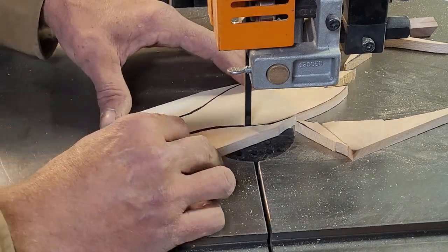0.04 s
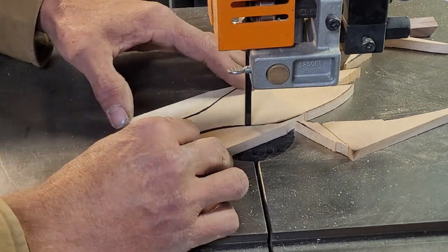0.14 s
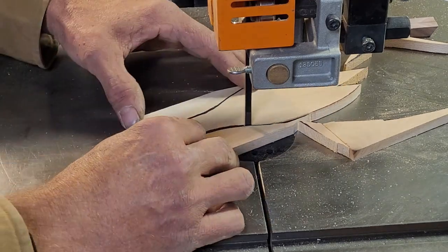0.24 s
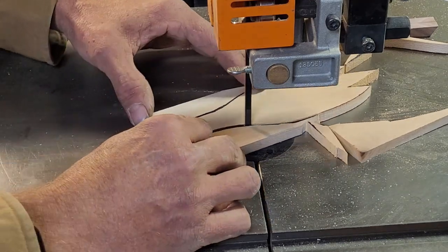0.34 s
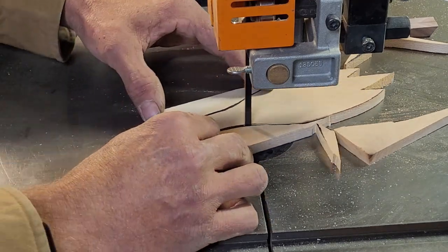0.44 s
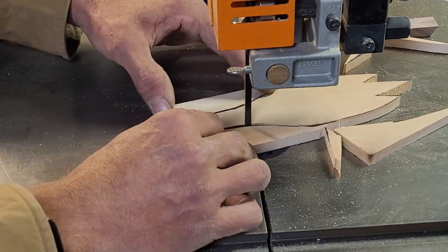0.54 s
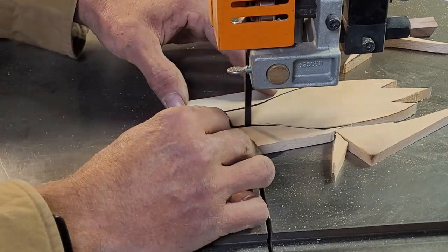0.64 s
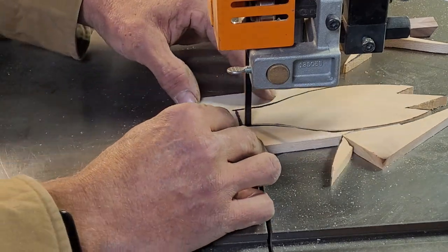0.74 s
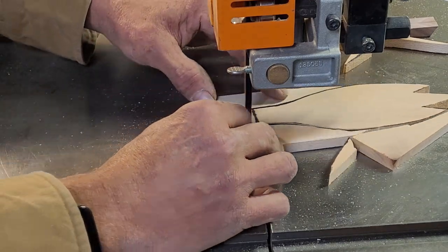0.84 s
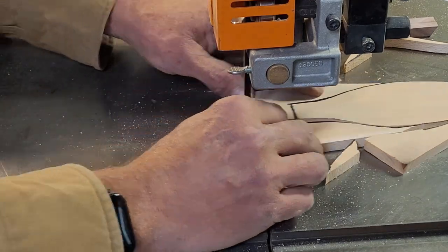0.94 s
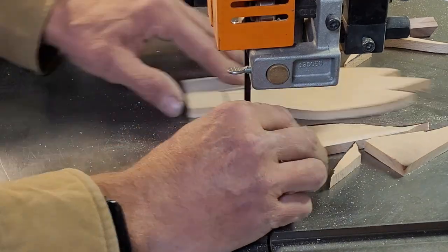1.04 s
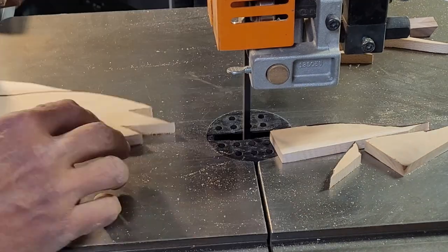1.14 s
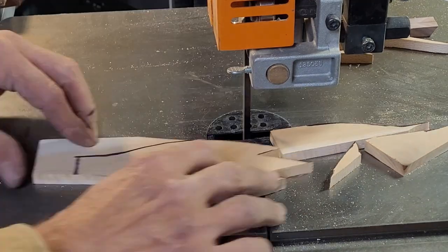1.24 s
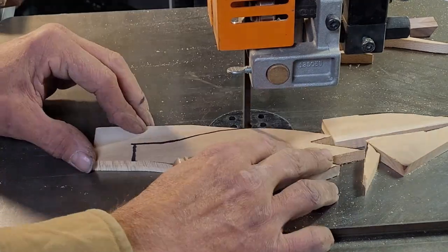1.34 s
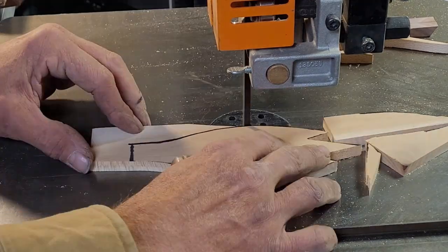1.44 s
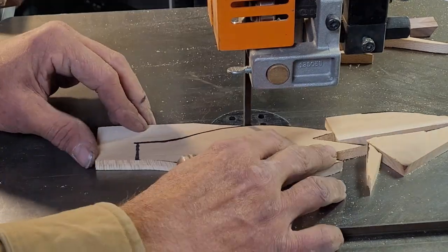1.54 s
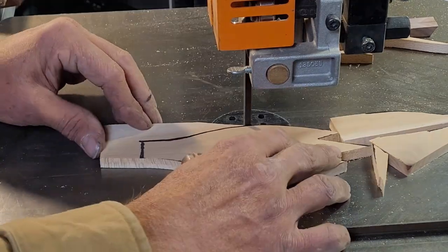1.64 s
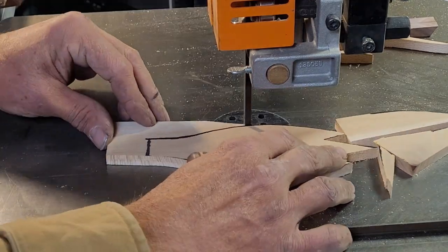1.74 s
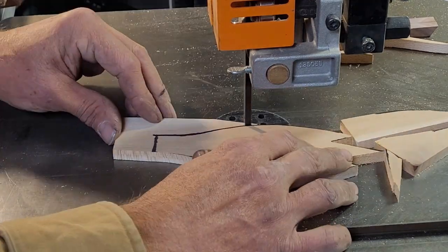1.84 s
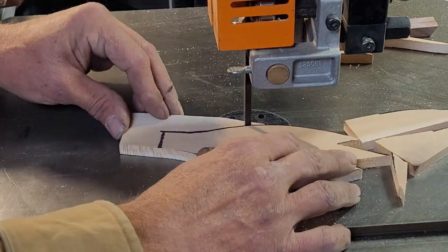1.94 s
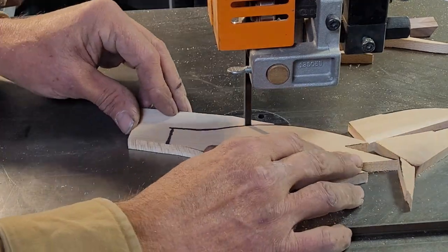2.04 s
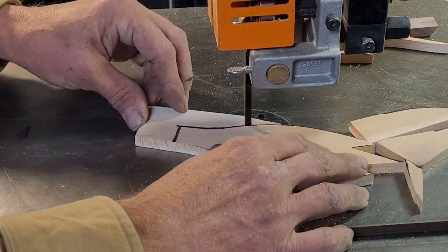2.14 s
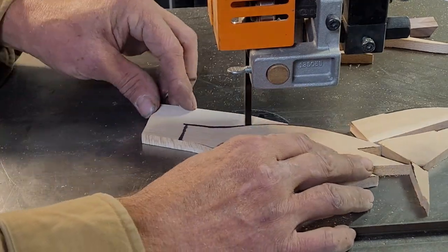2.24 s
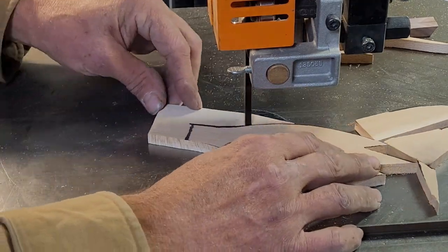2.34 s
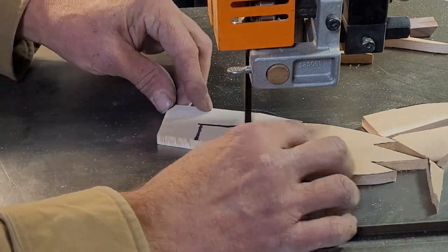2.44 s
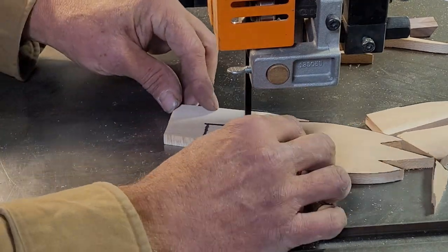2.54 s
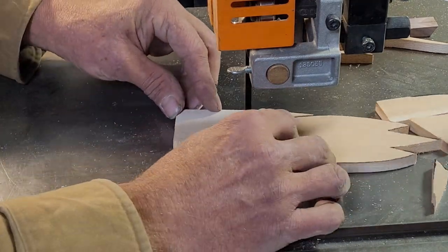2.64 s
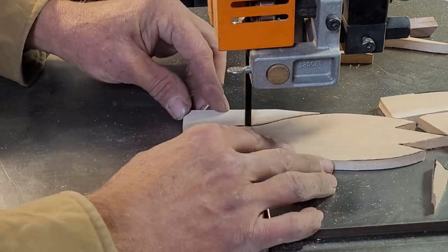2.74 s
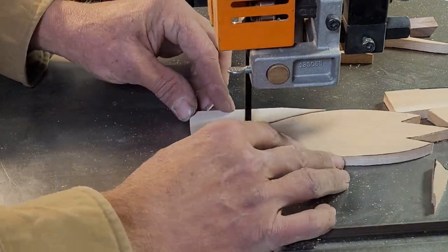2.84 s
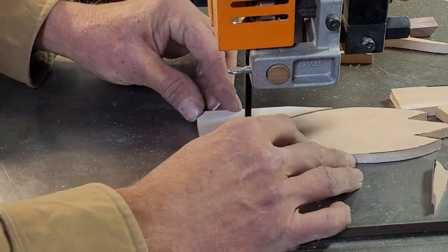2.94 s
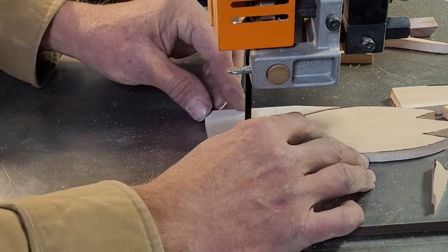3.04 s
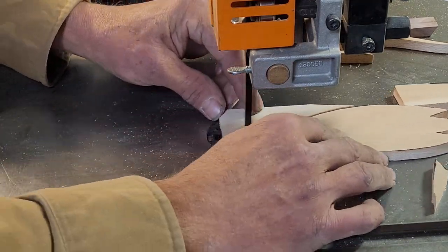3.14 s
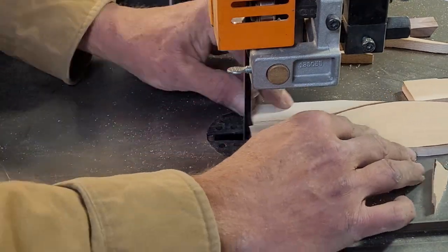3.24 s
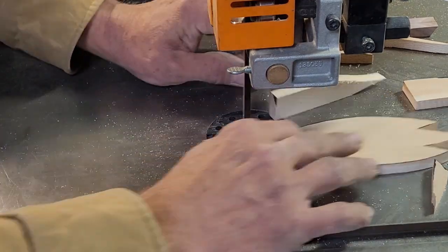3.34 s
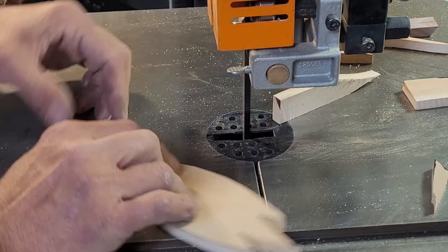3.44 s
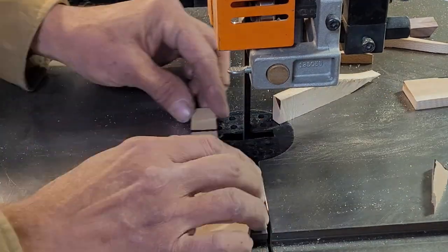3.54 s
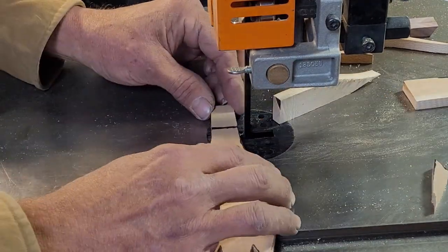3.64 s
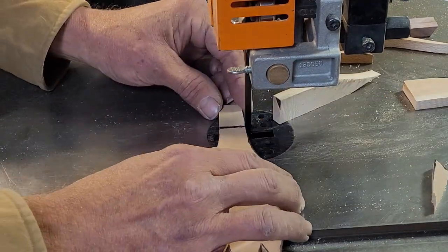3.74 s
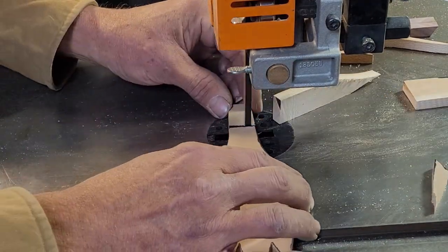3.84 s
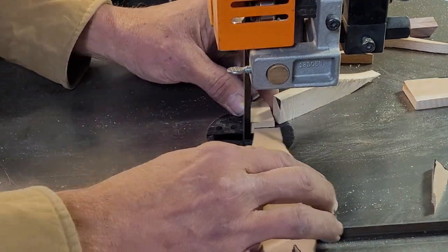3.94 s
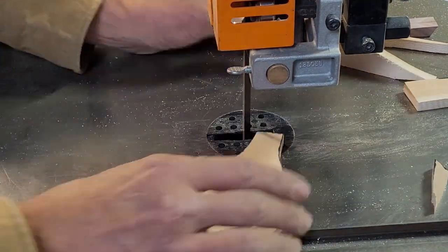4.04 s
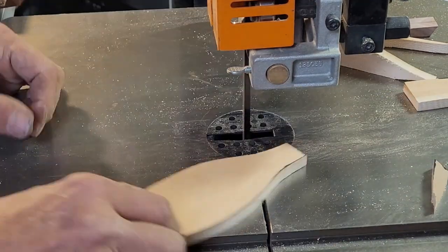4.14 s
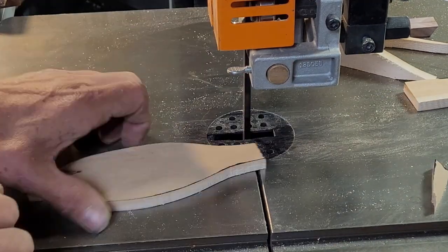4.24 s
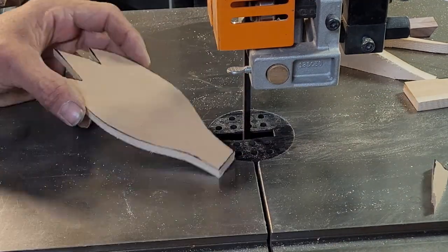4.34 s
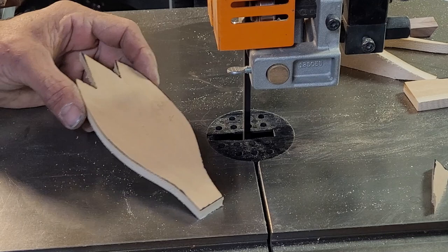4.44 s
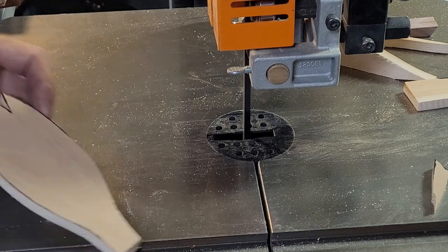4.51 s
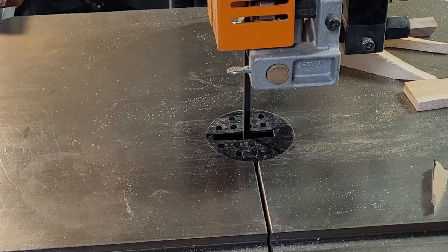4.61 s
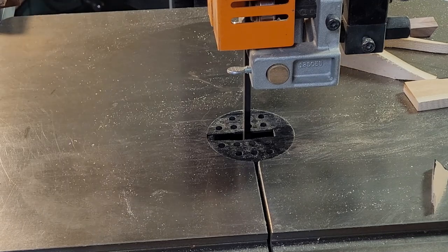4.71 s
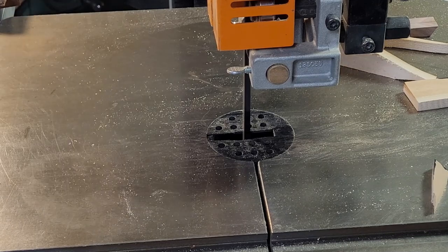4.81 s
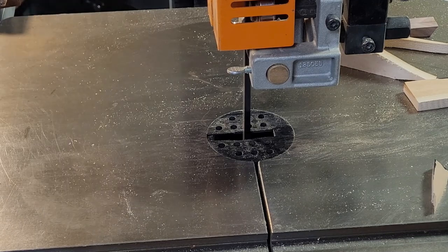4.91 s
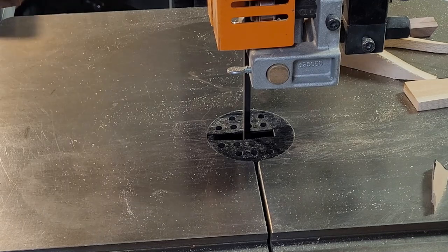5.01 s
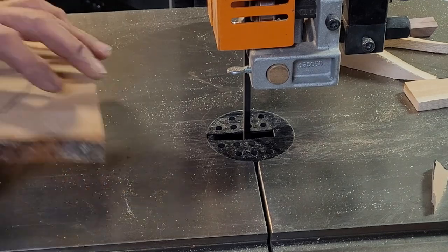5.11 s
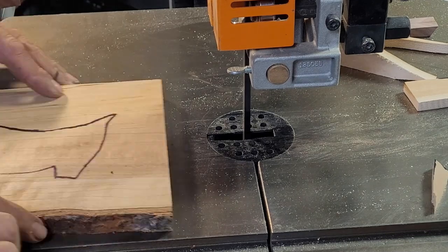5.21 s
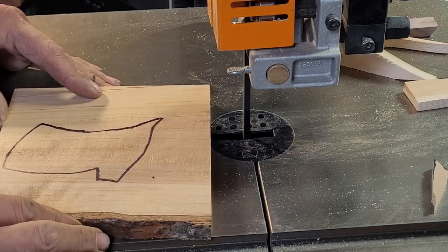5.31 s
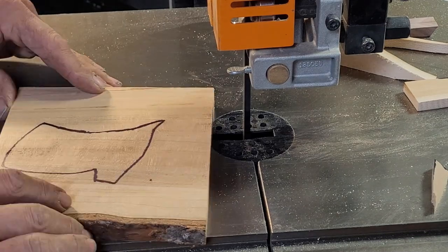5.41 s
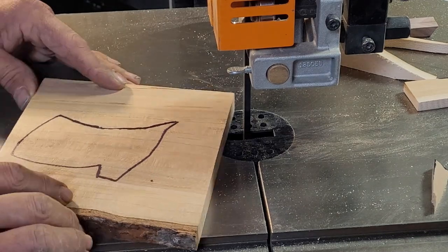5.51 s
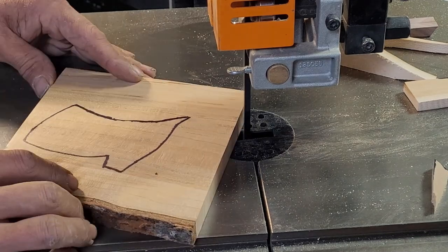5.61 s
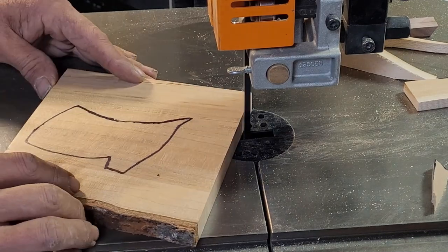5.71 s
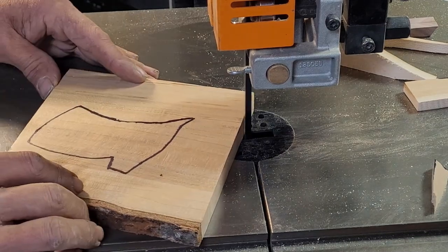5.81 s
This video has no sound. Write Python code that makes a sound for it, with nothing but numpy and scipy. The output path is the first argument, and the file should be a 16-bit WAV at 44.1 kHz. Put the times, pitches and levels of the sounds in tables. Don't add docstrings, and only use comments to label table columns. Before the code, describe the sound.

A bandsaw runs throughout, heard close in a small workshop: low steady hum, ringing frame tones, wavering panel whines and a broad rush of air. The blade is already cutting a curve in wood, with a strong midrange singing tone, a high whistle and fluttering grainy hiss. At about 1.03 s it breaks free with a very short squeal stepping downwards; around 1.3 to 2 s another motor faintly climbs in pitch behind. Only the idling saw remains until about 1.6 s, when a longer, brighter, sizzling cut begins, ending in a squeal at 3.35 s. A short, duller cut runs from 3.8 to 4.04 s and chirps out. The saw idles; a small tap falls at 4.85 s, then rapid hard clacks of board on iron at 5.22 to 5.26 s. At 5.83 s a new whistling cut starts and is cut off. Background level dips after loud moments and recovers.

```python
import sys
import numpy as np
from scipy import signal
from scipy.fft import rfft, irfft, next_fast_len
from scipy.io import wavfile
from scipy.ndimage import map_coordinates

SR = 44100
rng = np.random.default_rng(int(sys.argv[2]) if len(sys.argv) > 2 else 0)


def boost(x):
    u = np.asarray(x, float) / 20
    return 10 ** u


def output_pcm(signal):
    pcm = np.clip(np.atleast_2d(signal).T, -1, 1) * 32767
    wavfile.write(sys.argv[1], SR, np.round(pcm).astype(np.int16))


N = 258867
T = np.arange(N) / SR
SHAFT_HZ = 25.27

# time in seconds, pitch in Hz, level in dB.
FAR_MOTOR = [(0, 301, -76), (.9, 308, -72), (1.3, 317.5, -67), (1.6, 341, -62.5), (1.9, 358, -74),
             (2.1, 368, -80)]
# time in seconds, level in dB.
CAMERA_GAIN = [(0, -56.5), (.96, -55), (1.05, -57), (1.31, -57), (1.4, -53), (1.54, -52.5), (1.78, -56.5),
               (3.6, -56), (3.73, -53.5), (4.05, -56), (4.3, -57), (4.42, -53), (5.08, -54.5), (5.2, -52),
               (5.26, -57.5), (5.5, -57), (5.6, -54), (5.87, -53.5)]
# multiple of ten times the shaft speed, level in dB.
HUM = [(1, -1), (2, -1), (3, -1), (4, -38), (5, -40), (6, -10.5), (7, -7), (8, -22), (10, -11.5)]
# pitch in Hz, width in Hz, level in dB.
FRAME = [(475, 5.3, -16.5), (792, 7.9, -8.5), (890, 39, -9.5), (949, 5, -14), (1145, 52, -6),
         (1349, 7.1, -7), (1473, 11, -11), (2127, 10, -14.5), (6630, 7.6, -15), (9500, 32, -40),
         (11500, 30, -38)]
# frequency in Hz, level in dB per Hz.
RUSH = [(20, -24.5), (40, -24.5), (80, -19.5), (135, -23.5), (180, -9.5), (330, -11), (440, -13),
        (620, -7.5), (1100, -5), (1820, -4), (2330, -12.5), (4330, -13), (5230, -17), (9460, -13.5),
        (15800, -27.5)]
# pitch in Hz, width in Hz, level in dB.
GUIDES = [(3978, 12, -7), (4404, 22, -9), (4253, 40, -14), (2740, 120, -15)]
# pitch in Hz, width in Hz, level in dB.
PANELS = [
    [(690.5, 2, 0)],
    [(1045.5, 2, 0)],
    [(1620, 12, -1)],
    [(1820, 14, -3), (1884, 3, -5)],
]
# start in seconds, length in seconds, level in dB over the motor's lowest tone.
PANEL_SPELLS = [
    [(-.6, 2.2, -4.5), (1.2, 1.35, -3.5), (3.7, 0.32, -6), (4.35, 1.04, -1), (5.5, 0.68, -5)],
    [(.2, 2.25, -1.5), (3.25, 0.38, -4), (3.7, 0.3, -3), (4.25, 0.95, -7.5), (5.45, 0.32, -6)],
    [(-.2, 1.45, -2), (1.3, 1.45, 0.5), (3.05, 0.37, .5), (3.85, 0.56, -6.5), (4.4, 1.4, -8)],
    [(.3, 0.9, 0.5), (1.3, 0.33, -0.5), (1.6, 0.78, 7), (3.05, 0.28, 2.5), (3.9, .25, -3), (4.2, 0.65, -2),
     (5.05, 0.68, -13)],
]
# time in seconds, peak in dB, wood in dB, iron in dB.
KNOCKS = [
    (4.8485, -28, -22, -37),
    (5.2223, -41, 13, -3),
    (5.2303, -32, -9, -11),
    (5.2335, -52, 10, -6),
    (5.2373, -23.5, -21, -14.5),
    (5.2438, -27.5, -2.5, -9),
    (5.2580, -24.5, -12, -15),
]
# pitch in Hz, width in Hz, level in dB.
WOOD = [(860, 83, 2.5), (1400, 270, -1.5), (2180, 770, -5), (3490, 320, -0.5)]
# pitch in Hz, width in Hz, level in dB.
IRON = [(4730, 450, -1), (5800, 220, 6.5)]
# pitch in Hz, width in Hz, level in dB.
EDGE = [(8900, 480, -2.5), (9980, 720, 4), (11850, 2900, -6.5), (15300, 2500, -8), (7640, 2700, -7.5)]
# start in seconds, length in seconds, pitch in Hz, width in Hz.
CHATTER = [(-.2, .55, 4950, 320), (-.1, .4, 6050, 500), (-.2, 1.3, 3985, 25), (.92, .1, 2050, 150),
           (.99, .05, 1570, 60), (.98, .06, 13500, 1500), (1.07, .33, 2650, 12), (1.52, .22, 6700, 40),
           (2.1, 1.15, 3970, 18), (2.27, .09, 7950, 250), (2.5, .95, 1150, 45), (3.2, .1, 2120, 100),
           (3.22, .1, 3300, 500), (3.305, .036, 6100, 600), (3.82, .19, 3500, 110), (3.82, .2, 4750, 150),
           (4.08, .4, 2655, 12), (1.6, 1, 7101, 12), (-.2, .6, 13394, 20), (1.7, .7, 2150, 60),
           (.95, .085, 4950, 250), (.2, .7, 2140, 25)]
CHATTER_DB = [-42, -51, -63, -49.5, -43, -49, -58, -51.5, -57.5, -51, -55.5, -53, -50.5, -40, -49, -52,
              -57.5, -60, -59, -61, -47.5, -58]
# time in seconds, level in dB, stretch in time (1 is normal).
EXITS = [
    (1.028, -30.5, 1.01),
    (3.346, -30, 1.02),
    (4.039, -28.5, .98),
]
# delay in seconds, length in seconds, start in Hz, end in Hz, level in dB.
SQUEAL = [(.0006, 0.0077, 4450, 3910, 0), (.006, 0.0088, 4300, 3900, -11.5),
          (-.001, 0.019, 2700, 2300, -10), (.007, 0.0088, 3350, 3140, -2), (.014, 0.019, 2850, 2500, 0.5),
          (.03, 0.024, 2650, 2300, -15), (0.034, .0197, 2000, 1430, -19), (.004, 0.0226, 8500, 7800, -18.5),
          (.025, 0.015, 6300, 5600, -18.5), (0.012, 0.016, 4300, 3800, -22)]
# time in seconds, feed level in dB, twist (side load of a curve on the blade).
FEED = [
    [(0, -51.5, -0.67), (.2, -52, -1.26), (.3, -52.5, -0.66), (.62, -51, -0.03), (.86, -49, 1.2),
     (1.0, -49, -0.0065), (1.048, -50.5, 1.15), (1.07, -56, 1.2), (1.09, -57, 1.2)],
    [(1.52, -64, 0.1), (1.654, -52.5, -0.16), (2.0, -51, -0.077), (2.3, -51, 0.73), (2.52, -50, -0.23),
     (2.8, -51.5, 0.27), (3.19, -50.5, 0.13), (3.34, -48.5, 0.73), (3.4, -56.5, 0.61)],
    [(3.79, -65, .1), (3.822, -48, .1), (3.944, -52, .1), (4.05, -47.5, .1), (4.12, -63, .1)],
    [(5.826, -75, .1), (5.846, -51.5, 0.093), (5.87, -56, .1)],
]
# start in seconds, rise in seconds, end in seconds, fall in seconds.
SINGING = [
    (-.1, .02, 1.06, .03),
    (1.65, .03, 3.38, .16),
    (3.83, 0.088, 4.08, 0.075),
    (5.83, 0.022, 6.1, .02),
]
# tone in dB, whistle in dB, board in dB, sizzle in dB.
PIECES = [
    (6.5, 0, -0.5, -6),
    (3, -1, -9.5, -1.5),
    (3, -10, -4, -13),
    (4, 2, -22, -3),
]
# start in seconds, length in seconds, extra level in dB.
FLARES = [(1.96, .4, 6), (3.0, 0.19, 2.5), (0.73, .25, 4)]
# pitch in Hz, level in dB, lead of the left in radians.
TONE = [(1731, 0, .9), (1706, -16, .5), (1756, -14, 1.2)]
# pitch in Hz, level in dB, lead of the left in radians.
WHISTLE = [(4965, 0, -.7), (4990, -7, -.5), (5168, -10, .6)]
# pitch in Hz, level in dB, lead of the left in radians.
BOARD = [(2597, 0, .3), (2622.3, -3, .3), (2571.7, -8, .3), (2853, -7, .4)]
# pitch in Hz, width in Hz, level in dB.
SKIRTS = [
    [(1740, 70, -13)],
    [(4885, 50, -11), (5000, 300, -13)],
]
# frequency in Hz, level in dB per Hz.
KERF = [(500, -50), (1500, -2), (2000, -18), (2350, -4.5), (3000, -2), (4100, -3), (5500, -2.5), (8000, -2),
        (12000, -2), (15000, -4), (15800, -11)]
# pitch in Hz, width in Hz, level in dB.
BLADE = [(3590, 40, -18), (6185, 90, -14), (7101, 10, -19), (8403, 25, -22), (13394, 10, -24),
         (15500, 300, -15)]
# pitch in Hz, width in Hz, level in dB.
SIZZLE = [(9440, 120, 3), (10300, 300, 1.5), (10800, 290, 1), (11500, 230, 2)]
# frequency in Hz, likeness (1 is identical).
ALIKE = [(100, 1), (300, 1), (1000, 1), (3000, 0.81), (8000, 0.38), (15000, 0.32)]
# frequency in Hz, left minus right in dB.
LEAN = [(60, 3), (110, -5), (250, 4.5), (380, -6), (700, 2.5), (1290, -0.5), (1730, -5), (2400, -1.5),
        (8000, -3), (15000, 0.5)]


def unit(x):
    return x / np.sqrt(np.mean(x ** 2) + 1e-20)


def along(points, hz):
    f, v = np.transpose(points)
    return np.interp(np.log(hz + 1), np.log(f + 1), v)


def curves(rows):
    s, *cols = np.transpose(rows)
    return [np.interp(T, s, c) for c in cols]


def spans(tables, fade):
    rows = []
    for table in tables:
        quiet = [-85] * (len(table[0]) - 1)
        rows += [(table[0][0] - fade, *quiet), *table, (table[-1][0] + fade, *quiet)]
    return curves(rows)


def wobble(rate):
    return map_coordinates(rng.standard_normal(int(N * rate / SR) + 4), [T * rate])


def swell(s, length):
    return np.abs(np.sin(np.pi * np.clip((T - s) / length, 0, 1)))


def filtered(x, response):
    m = next_fast_len(N + SR // 2)
    return irfft(rfft(x, m) * response(np.fft.rfftfreq(m, 1 / SR)), m)[..., :N]


def noise(gain, alike):
    def response(hz):
        turn = np.arccos(np.clip(alike(hz), -1, 1)) / 2
        return gain(hz) * [np.cos(turn), np.sin(turn)]

    mid, side = filtered(rng.standard_normal((2, N)), response)
    return unit(np.array([mid + side, mid - side]))


def ring(modes, steady, alike=0.95):
    out = np.zeros((2, N))
    m = next_fast_len(N)
    f = np.arange(m // 2) * SR / m
    turn = np.arccos(np.clip(alike, -1, 1)) / 2
    to_sides = [[np.cos(turn), np.sin(turn)], [np.cos(turn), -np.sin(turn)]]
    for hz, width, db in modes:
        near = np.abs(f - hz) < 10 * width + 20
        a, b = rng.standard_normal((2, 2, near.sum()))
        lines = np.zeros((2, m), complex)
        lines[:, :m // 2][:, near] = (a + 1j * b) / (1 + (2 * (f[near] - hz) / width) ** 2)
        z = np.fft.ifft(to_sides @ lines)[:, :N]
        size = unit(np.abs(z).mean(0))
        out += boost(db) * unit(z.real / (size + 0.03) ** np.clip(steady, 0, 1))
    return out


def sing(lines, drift, flutter_db):
    side = np.array([[.5], [-.5]])
    out = np.zeros((2, N))
    for hz, db, lead in lines:
        level = boost(db + 3 + flutter_db * wobble(28.25))
        out += level * np.sin(2 * np.pi * hz * T + drift * wobble(12) + lead * side)
    return out


def turn_beat(depth, top):
    angle = 2 * np.pi * SHAFT_HZ * T + 0.36 * wobble(1.88)
    swells = sum(np.sin(k * angle + rng.uniform(0, 2 * np.pi)) / k ** 0.96 for k in range(1, top + 1))
    return 1 + depth * swells


def walls(x, echo_db, t60):
    t = np.arange(SR // 10) / SR
    answer = rng.standard_normal((2, len(t))) * boost(-60 * t / t60)
    answer *= boost(echo_db) / np.linalg.norm(answer[0])
    answer[:, 0] = 1
    return unit(signal.fftconvolve(x, answer, axes=1)[:, :N])


def shop(x):
    t = np.arange(SR // 4) / SR
    tail = rng.standard_normal((2, len(t))) * boost(-60 * t / 0.068) * (t > .003)
    return signal.fftconvolve(x[None], tail / np.linalg.norm(tail[0]), axes=1)[:, :N]


def far_motor():
    hz, db = curves(FAR_MOTOR)
    return boost(db + 5.5 + 0.96 * wobble(7.1)) * np.sin(2 * np.pi * np.cumsum(hz) / SR)


def motor_hum():
    phase = 2 * np.pi * np.cumsum(10 * SHAFT_HZ + 0.17 * wobble(4)) / SR
    return sum(boost(db + 0.25 * k * wobble(6)) * np.sin(k * phase + k * k) for k, db in HUM) * np.sqrt(2)


def blade_guides():
    loop_hz, weld_s, weld_dip_db = 9.5, 4.575, 9.5
    guides = ring(GUIDES, steady=.95, alike=.7) * turn_beat(.3, top=2) * boost(3 + wobble(12))
    weld = np.cos(np.pi * loop_hz * (T - weld_s) + .2 * wobble(4)) ** 6
    return guides * boost(-weld_dip_db * weld)


def cover_panels():
    out = np.zeros((2, N))
    for spells, modes in zip(PANEL_SPELLS, PANELS):
        level = boost(-10.5) + sum(boost(db) * swell(s, length) ** 0.69 for s, length, db in spells)
        out += level * boost(1.7 * wobble(4.2)) * ring(modes, steady=0.81)
    return out


def machine():
    gain_db, = curves(CAMERA_GAIN)
    rush = noise(lambda f: boost(along(RUSH, f)), lambda f: along(ALIKE, f))
    rush = walls(rush, echo_db=-7, t60=0.13)
    body = boost(1.5) * (motor_hum() + ring(FRAME, steady=0.18) + blade_guides()) + cover_panels()
    return boost(gain_db) * (body + boost(8 + 0.11 * wobble(12)) * rush)


def body_response(modes):
    def response(f):
        return sum((-1) ** k * boost(db) * 1j * f * width / (hz * hz - f * f + 1j * f * width)
                   for k, (hz, width, db) in enumerate(modes))

    return response


def knocks():
    t = np.arange(SR // 20) / SR
    wood, iron, edge = np.zeros((3, N + SR))
    for s, db, wood_db, iron_db in KNOCKS:
        for part, level, t60 in ((wood, wood_db, .06), (iron, iron_db, .05), (edge, 0, .03)):
            fade = boost(-60 * t / 0.0051) + 0.31 * boost(-60 * t / t60)
            force = (1 - np.exp(-t / 0.00044)) * fade * rng.standard_normal(len(t))
            part[round(s * SR):][:len(t)] += boost(db + level) * force
    return (boost(18.0) * filtered(wood[:N], body_response(WOOD))
            + boost(23.0) * filtered(iron[:N], body_response(IRON))
            + boost(9.0) * filtered(edge[:N], body_response(EDGE)))


def chatter():
    out = np.zeros((2, N))
    for (s, length, hz, width), db in zip(CHATTER, CHATTER_DB):
        out += swell(s, length) ** 0.5 * ring([(hz, width, db)], steady=150 / (150 + width), alike=0.89)
    return out


def squeals():
    out = np.zeros(N)
    for s, db, stretch in EXITS:
        for delay, length, hz0, hz1, step_db in SQUEAL:
            rough = np.clip(0.19 - 0.1 * step_db, 0, 1)
            u = np.arange(round(length * stretch * SR)) / (length * stretch * SR)
            hz = np.linspace(hz0, hz1, len(u)) * rng.normal(1, 0.0087)
            start = round((s + delay * stretch) * SR)
            slip = map_coordinates(rng.standard_normal((2, 40)), [[0 * u, 0 * u + 1], [u * length * 900] * 2])
            wave = (1 + rough * slip[0]) * np.sin(2 * np.pi * np.cumsum(hz) / SR + 1.2 * rough * slip[1])
            out[start:start + len(u)] += boost(db + step_db) * np.sin(np.pi * u ** 1.15) ** 0.92 * wave
    return out


def tearing_hiss():
    tear = noise(lambda f: boost(along(KERF, f)), lambda f: along(ALIKE, f))
    tear = walls(tear, echo_db=1, t60=0.04)
    grain = boost(0.45 * wobble(700))
    return (unit(tear * grain) + ring(BLADE, steady=0.29, alike=0.53)) * turn_beat(.16, top=10)


def cutting():
    feed_db, twist = spans(FEED, fade=0.052)
    twist = np.clip(twist, -2, 2)
    piece = np.searchsorted([cut[0][0] - .1 for cut in FEED[1:]], T)
    tone_db, whistle_db, board_db, sizzle_db = np.transpose(PIECES)[:, piece] + feed_db
    deep = 0.12 + sum(np.clip(np.minimum((T - a) / rise, (b - T) / fall), 0, 1) for a, rise, b, fall in SINGING)

    hiss = tearing_hiss()
    tone = sing(TONE, drift=.25, flutter_db=1.1) + ring(SKIRTS[0], steady=.2, alike=.8)
    whistle = sing(WHISTLE, drift=.3, flutter_db=1.3) + ring(SKIRTS[1], steady=.2, alike=.8)
    whistle = unit(whistle) * turn_beat(.13, top=7)
    sizzle = unit(ring(SIZZLE, steady=.1, alike=0.65))
    flare_db = sum(db * swell(s, length) for s, length, db in FLARES)
    board = unit(sing(BOARD, drift=0.5, flutter_db=4.0))

    song = boost(tone_db + 1 * twist + 1.0 * wobble(7.18)) * tone
    song = song + boost(whistle_db - 8.5 * twist) * whistle
    song = song + boost(board_db + 17 * np.minimum(twist, 0)) * board
    return deep * song + boost(feed_db + 6.5) * hiss + boost(sizzle_db + flare_db) * sizzle


def scene():
    sharp = squeals() + knocks()
    return machine() + far_motor() + cutting() + chatter() + sharp + boost(-4) * shop(sharp)


def low_pass(x):
    return signal.sosfilt(signal.butter(12, 17110, fs=SR, output="sos"), x)


def record(dry):
    def microphones(hz):
        lean = boost(along(LEAN, hz) * [[.5], [-.5]])
        return lean * np.where(hz < 15850, 1, boost(-43))

    return low_pass(filtered(dry, microphones))


dry = scene()
out = record(dry)
output_pcm(out)
```